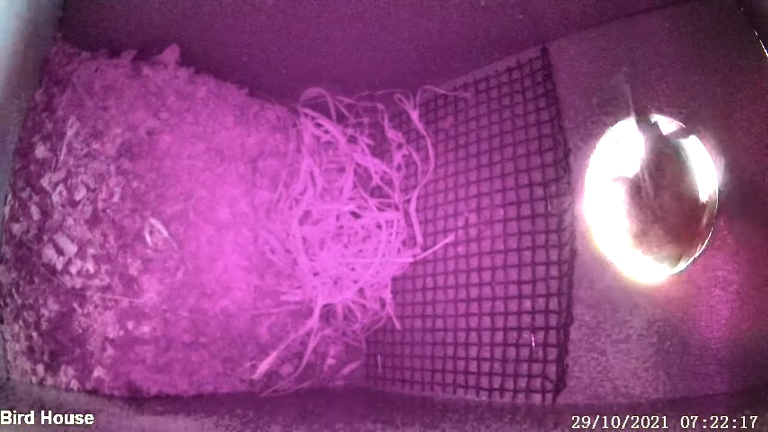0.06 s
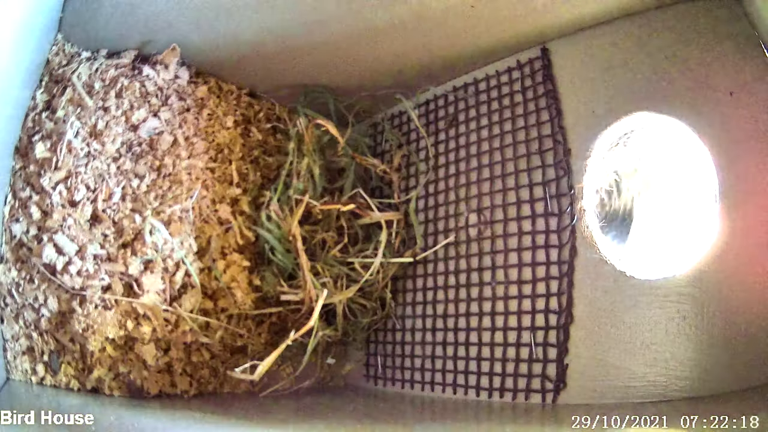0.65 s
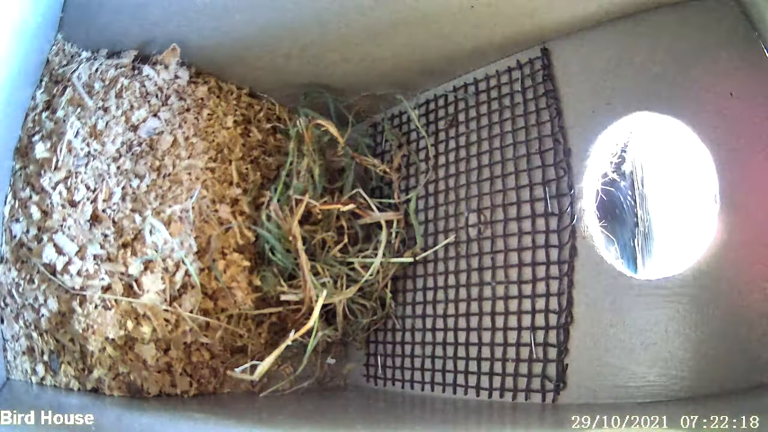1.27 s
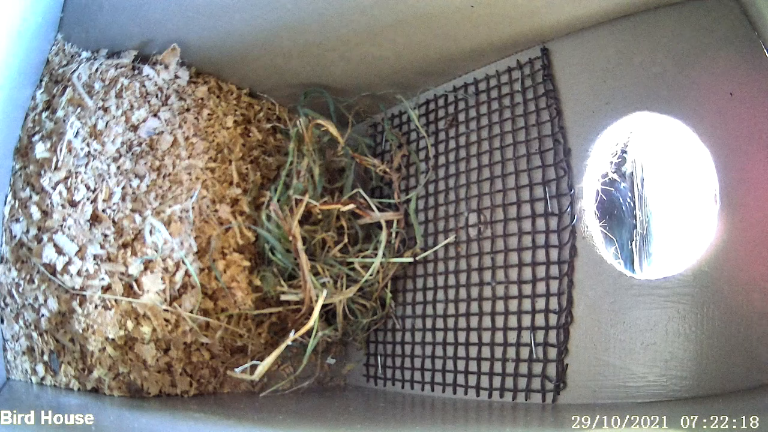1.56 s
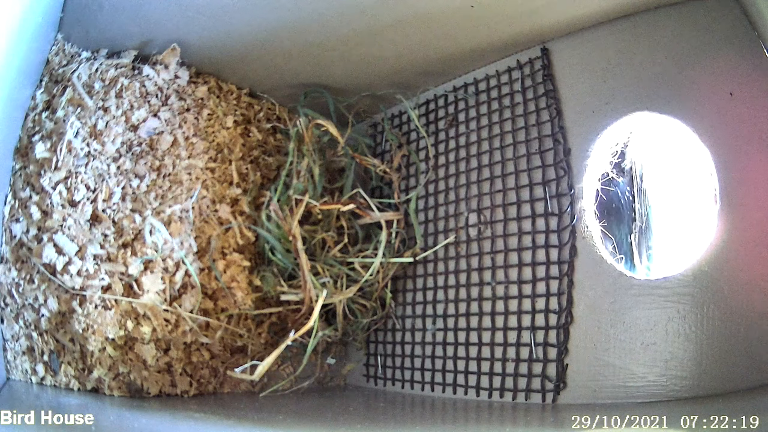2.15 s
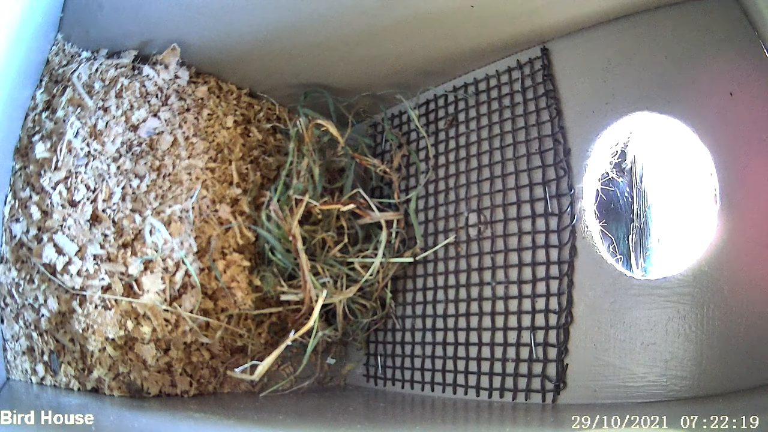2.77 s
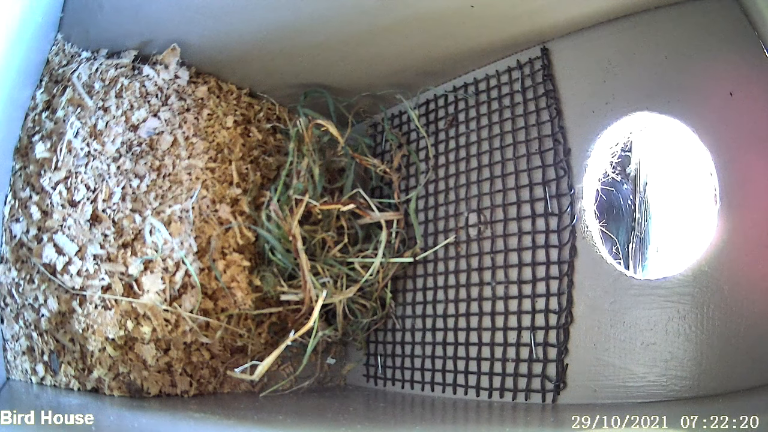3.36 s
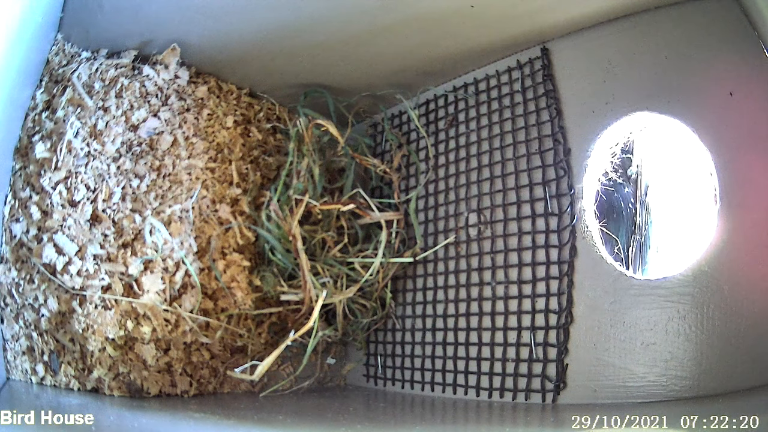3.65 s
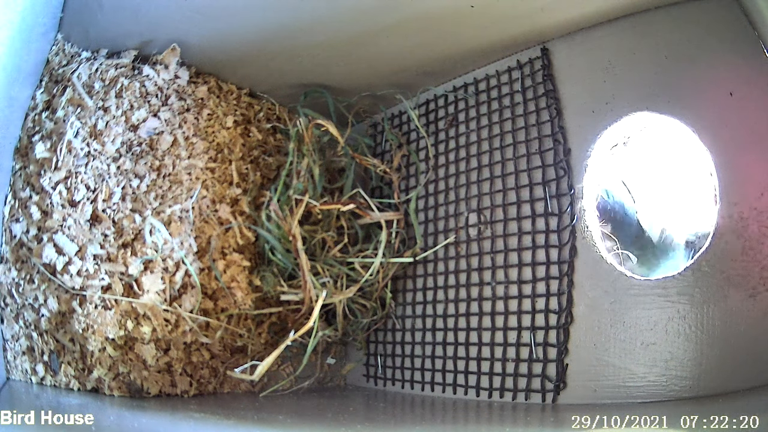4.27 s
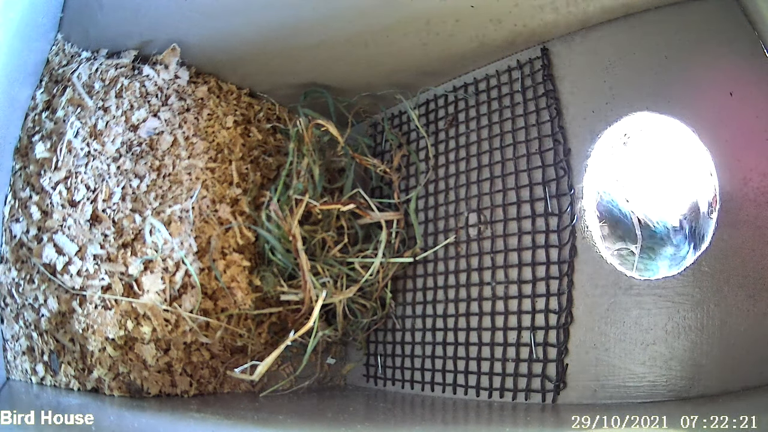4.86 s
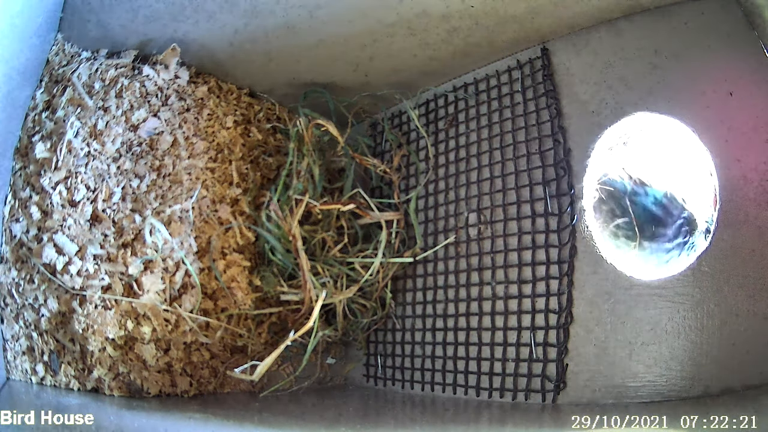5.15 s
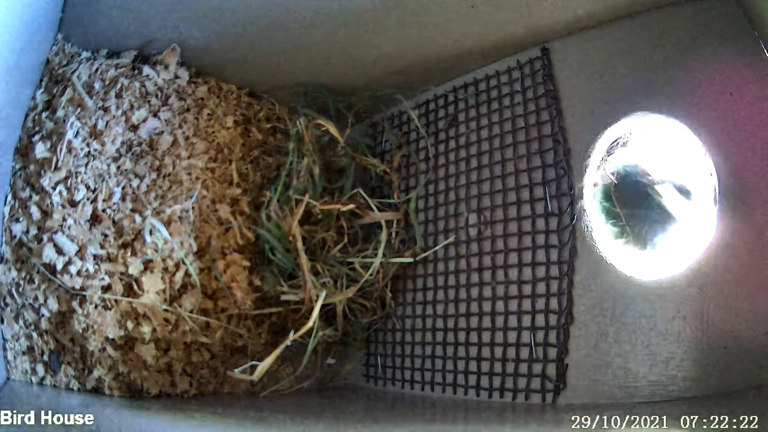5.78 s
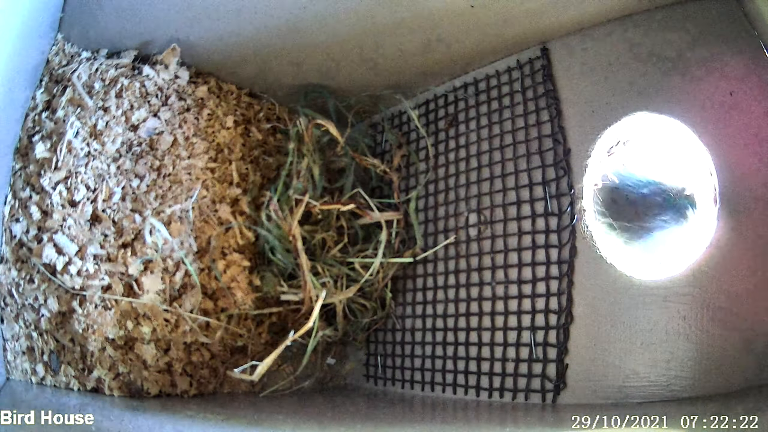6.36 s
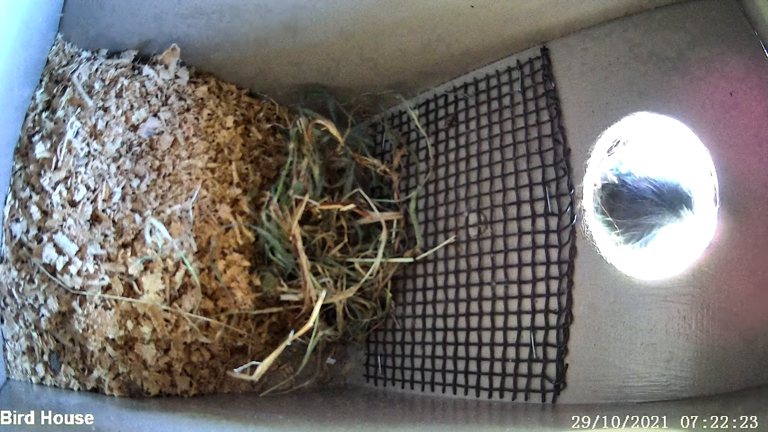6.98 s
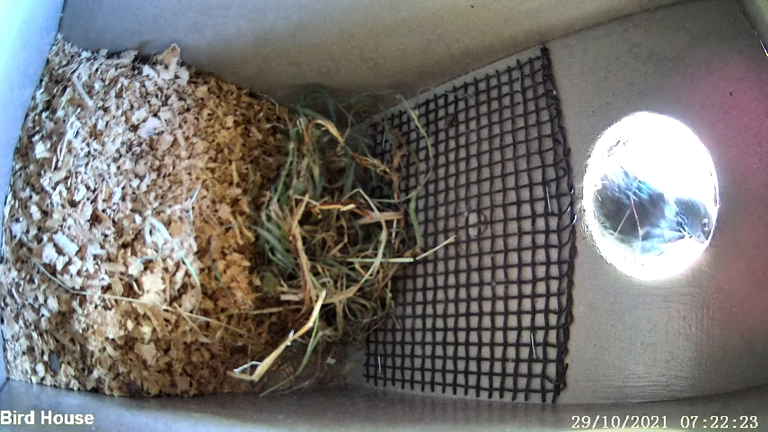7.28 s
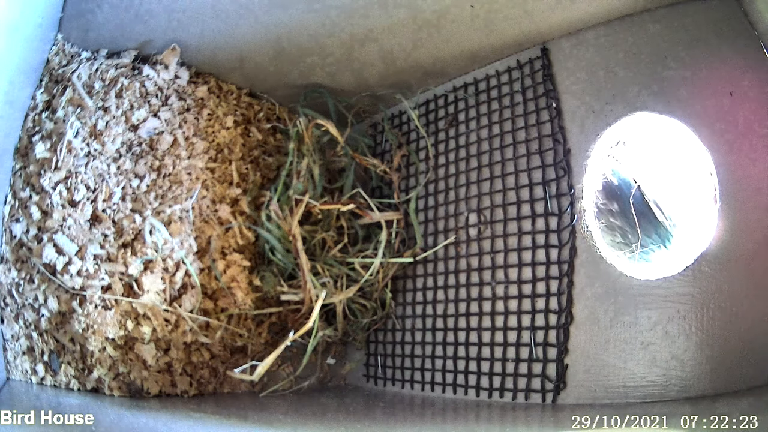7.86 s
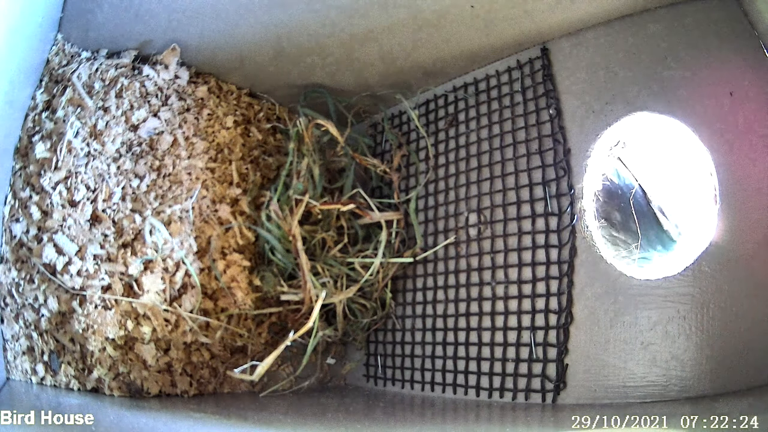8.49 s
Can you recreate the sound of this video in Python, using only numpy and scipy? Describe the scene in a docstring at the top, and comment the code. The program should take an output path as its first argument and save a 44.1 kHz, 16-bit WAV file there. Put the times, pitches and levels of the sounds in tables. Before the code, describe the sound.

A bird lands at the entrance of a wooden nest box, heard close from inside. In the first 0.4 seconds claws scrape and squeak, wings thump the air and feet knock the wall, loud enough to overload briefly. Faint scuffs trail off by 1 second. From about 2.8 to 3.4 seconds comes a second burst of scratching, dull flutters and body bumps, with a softer shuffle near 3.8. Between 4.4 and 5.4 seconds the bird shifts with light scuffs, low puffs of air and four small wooden knocks with tiny squeaks. After that only a few faint scratches remain. Throughout, low wind rumble, a wavering hollow hum and soft hiss continue. Thin, very faint chirps come from outside now and then, clearest near 5.5 seconds. The sound is boxy and narrow, with a glassy edge.

```python
"""A bird clings to the entrance of a wooden nest box, heard by a small camera inside.
Claws scrape, squeak and knock on the wood; wings and body pump the air of the box.
Outdoor rumble hums in the hole, with hiss and faint birds behind it.
The camera overloads on the landing; its narrow-band sample-and-hold adds a glassy edge."""
import sys
import numpy as np
from scipy import signal
from scipy.fft import rfft, irfft, next_fast_len
from scipy.io import wavfile
from scipy.ndimage import uniform_filter1d

SR = 44100
rng = np.random.default_rng(int(sys.argv[2]) if len(sys.argv) > 2 else 0)


def dump(signal):
    """Clip the signal to [-1, 1] and save it as 16-bit WAV at the path in sys.argv[1]."""
    limited = np.clip(np.atleast_2d(signal).T, -1, 1)
    pcm = np.round(limited * 32767).astype(np.int16)
    wavfile.write(sys.argv[1], SR, pcm)


N = 380141
TIME_S = np.arange(N) / SR

# claws catch and skid: (time [s], level [dB], fall [s], treble lift [dB])
CATCHES = [(0.031, -18.5, 0.0032, 5), (0.1, -0.5, 0.0057, -3.5), (0.143, -8.5, 0.0069, 0),
           (0.154, -7.5, 0.0038, 3), (0.2541, 1.5, 0.0026, -4.5), (0.2631, -6.5, .0034, -18),
           (0.464, -40.5, 0.012, -17), (0.792, -39.5, 0.0054, 4), (1.304, -34.5, 0.0026, -3),
           (2.774, -35, 0.0055, 11), (2.916, -34, 0.011, -2), (2.936, -24.5, 0.016, -5),
           (3.067, -15, 0.011, -6.5), (3.133, -3, .012, -1.5), (3.191, -18.5, 0.0082, 11),
           (3.25, -19.5, 0.012, 2), (3.395, -26.5, .008, 0), (3.708, -40.5, 0.047, -8),
           (3.803, -29.5, .009, -24), (4.425, -35, 0.035, -2), (6.072, -44, .008, 12),
           (6.43, -45, 0.0066, 0), (8.554, -40.5, 0.047, -8.5)]
# toes and feathers drag over the rim: (peak time [s], level [dB], fall [s])
SCUFFS = [(0.123, -17, 0.026), (0.169, -17, 0.017), (0.216, -15, 0.022), (0.313, -31, 0.012),
          (0.504, -42.5, 0.026), (0.554, -34.5, .018), (2.847, -40.5, 0.033), (3.165, -22, .014),
          (3.211, -21, 0.018), (3.267, -21, 0.018), (3.32, -33.5, 0.021), (3.763, -32.5, 0.02),
          (4.477, -33.5, 0.014), (4.523, -31.5, 0.016), (4.581, -25, 0.0042), (4.702, -37, .012),
          (4.745, -37, 0.025), (5.383, -36, 0.0083), (5.529, -40, 0.021), (5.65, -39, 0.021)]
# bouts of light scuffs: (start [s], end [s], level [dB])
FIDGETS = [(0, .08, -28), (0.448, .62, -48.5), (0.809, .97, -46), (2.662, 2.83, -47.5), (3.828, 3.94, -46),
           (4.411, 4.6, -40.5), (4.69, 4.8, -42), (4.976, 5.12, -40), (5.28, 5.37, -42.5),
           (5.63, 5.71, -48.5)]
# claw squeaks: (peak time [s], level [dB], pitch [Hz], fall [s])
SQUEAKS = [(0.038, -19, 1308, 0.0093), (0.074, -24.5, 1080, 0.033), (0.104, -7.5, 1103, 0.0088),
           (0.147, -2.5, 1105, 0.0057), (0.38, -36, 1360, 0.0048), (3.144, -13, 1124, .008)]
# feet strike the wall: (time [s], peak [dB])
KNOCKS = [(0.2545, 2), (0.2623, 7.5), (0.268, -5)]
# steps round the rim: (time [s], knock [dB], squeak [dB])
STEPS = [(4.582, -23, -35), (4.768, -18.5, -40), (4.951, -20, -41), (5.163, -14, -35.5)]
# body shoves the air in the hole: (peak time [s], level [dB], pitch [Hz])
SHOVES = [(0.039, -4.5, 96.4), (0.122, 0, 123), (0.215, 4, 119.2), (0.244, 10, 70.6), (2.886, -20, 108),
          (2.976, -5.5, 119), (3.138, -8, 115), (3.191, -4, 73), (3.226, -5, 106), (3.254, 2.5, 81),
          (3.307, -7.5, 101), (3.407, -16, 103), (3.752, -10, 109), (3.773, -5, 113), (3.883, -15, 115),
          (4.44, -6.5, 97), (4.477, -13.5, 113), (4.524, -9, 78), (4.561, -2.5, 125), (4.709, -15, 118),
          (5.351, -14.5, 110.4)]
# breast bumps the wall: (time [s], peak [dB])
BUMPS = [(0.207, -14), (0.262, 1.5), (0.325, -17), (2.968, -19), (3.249, -20), (4.558, -25), (5.351, -22.5)]
# wing beats: (time [s], peak [dB])
WING_BEATS = [(0.168, -2.5), (0.202, -5.5), (0.258, 3), (0.294, -3), (2.905, -25), (3.029, -13),
              (3.109, -12), (3.277, -14), (4.428, -18.5), (4.516, -15), (4.552, -19.5), (5.35, -17)]
# hollow box: (frequency [Hz], width [Hz], gain [dB])
BOX_MODES = [(280, 59, -6), (696.2, 14.8, 9), (735, 11, 4.5), (856, 46, -5.5), (882, 42, -1),
             (1058, 45, 0.5), (1105, 32.6, 7), (1125, 11, -12), (1277, 26, -4), (1400, 34, 2),
             (1500, 13, -35), (1593, 23, -8.5), (1800, 13, -16.5), (2035, 97, -18), (2318, 33, -4),
             (2250, 32, -3), (2451, 100, -8.5), (2790, 22, -10), (2852, 25, -5.5), (2840, 14, -9),
             (3358, 110, -11), (3512, 38, -8)]
# front wall: (frequency [Hz], width [Hz], gain [dB])
WALL_MODES = [(185, 45, -5), (305, 59, 5), (458, 36, 22), (533, 58, 3), (717, 39, 13.5), (850, 48, -9),
              (2840, 350, 2.5)]
# air note of the hole: (time [s], pitch [Hz])
HOLE_HZ = [(0, 114), (1.2, 129), (2.1, 130), (3.3, 114), (4.35, 116), (5.05, 137), (5.5, 142), (6.15, 129),
           (6.6, 138), (8.1, 138), (8.6, 133)]
# air note of the hole: (time [s], level [dB])
HOLE_DB = [(0, -26.5), (1, -34), (2.9, -32), (3.85, -32), (4.35, -39.5), (4.8, -30), (5.4, -29.5),
           (5.65, -35.5), (6.65, -31), (7.1, -36.5), (7.7, -32.5), (8.05, -26.5), (8.6, -34.5)]
# outdoor rumble and hiss: (frequency [Hz], relative density [dB])
OUTDOOR_SPECTRUM = [(12, 0.5), (30, 0.5), (45, -1.5), (100, -4.5), (170, -13), (220, -21.5), (320, -28.5),
                    (600, -34.5), (1000, -38.5), (2000, -41), (3600, -45)]
# wind rumble: (time [s], gain [dB])
RUMBLE_DB = [(0, 11), (.45, 11.5), (.7, -4), (2.2, -1.5), (3.6, -1), (5.2, 5), (5.6, -2), (8.6, -7)]
# box resonances stirred from outdoors: (frequency [Hz], width [Hz], gain [dB])
DRONE_MODES = [(742.3, 18, 10), (848, 70, 4.5), (1078, 42, 4), (1380, 36, -11.5), (2370, 146, -11.5),
               (2780, 25, -6), (3476, 66, -8.5)]
# box drone: (time [s], level [dB])
DRONE_DB = [(0, -54.5), (2, -54), (4.2, -55), (6, -53), (7.2, -53.5), (8.1, -50.5), (8.6, -54.5)]
# birds outside: (peak time [s], level [dB], pitch [Hz])
CHIRPS = [(1.405, -51, 3550), (2.455, -52.5, 2860), (5.455, -42.5, 3550), (6.0, -54, 3550),
          (6.645, -57, 2380), (7.63, -55, 3570), (7.71, -51, 3570), (7.99, -60, 3520), (8.245, -57.5, 3550)]


def claws(box, fidgets_per_s=30, fidget_spread_db=2.5):
    """Catches, scuffs, squeaks, knocks and fidgeting at the entrance."""
    out = np.zeros(N)
    for at_s, db, fall_s, lift_db in CATCHES:
        add(out, *scrape(box, at_s, db, rise_s=0.0019, fall_s=fall_s, lift_db=lift_db))
    for row in SCUFFS:
        add(out, *scuff(box, *row))
    for row in SQUEAKS:
        add(out, *squeak(*row))
    for row in KNOCKS:
        add(out, *knock(*row))
    for start_s, end_s, db in FIDGETS:
        for slot_s in np.arange(start_s, end_s, 1 / fidgets_per_s):
            at_s = slot_s + rng.random() / fidgets_per_s / 2
            add(out, *scuff(box, at_s, db + fidget_spread_db * rng.standard_normal(), fall_s=0.012))
    return out


def scrape(box, at_s, db, rise_s, fall_s, lift_db, slips_per_s=1300, rub=0.2, treble_hz=2000):
    """Claws stick and slip on wood; each slip rings the box."""
    t, lead_in = swell(max(rise_s, 0.012), fall_s)  # a faint swell leads into each stroke
    _, bite = swell(rise_s, fall_s)
    force = np.maximum(bite, 0.12 * lead_in)
    count = len(t)
    slip_db = np.minimum(rng.exponential(1, count), 3)
    slips = gain_of(slip_db) * rng.choice([-1, 1], count)
    slips *= rng.random(count) < slips_per_s / SR
    friction = unit_rms(slips) + rub * rng.standard_normal(count)
    friction = coloured(friction, lambda hz: lift_db / (1 + (treble_hz / (hz + 1)) ** 4))
    stroke = signal.fftconvolve(force * friction, contact_response(box, spread_db=3))[:count]
    return at_s + t[0], gain_of(db) * np.sqrt(np.mean(force ** 2)) * unit_rms(stroke)


def scuff(box, at_s, db, fall_s):
    """Soft scrape; swells and fades."""
    return scrape(box, at_s, db, rise_s=0.6 * fall_s, fall_s=fall_s, lift_db=-2)


def squeak(at_s, db, hz, fall_s):
    """A claw slips evenly enough to sing."""
    return whistle(at_s, db, hz, rise_s=0.55 * fall_s, fall_s=fall_s, jitter=0.013, shimmer=0.24)


def knock(at_s, db, contact_hz=2500):
    """A foot lands; the wall rings briefly."""
    modes = signal.lfilter(*signal.butter(1, contact_hz, fs=SR), ring(WALL_MODES))
    wall = contact_response(modes, spread_db=2)
    return at_s, gain_of(db) * wall / abs(wall).max()


def steps(box, lead_s=0.005, fall_s=0.017):
    """Claws slide and squeak, the foot lands, the body follows."""
    out = np.zeros(N)
    for at_s, knock_db, squeak_db in STEPS:
        add(out, *scuff(box, at_s - lead_s, db=-33.5, fall_s=fall_s))
        add(out, *squeak(at_s - lead_s, squeak_db, hz=2873, fall_s=fall_s))
        add(out, *knock(at_s, knock_db))
        add(out, *shove(at_s, db=-14, hz=132.8))
    return out


def pumped_air():
    """Body and wings push the air of the box."""
    out = np.zeros(N)
    for source, table in (shove, SHOVES), (bump, BUMPS), (wing_beat, WING_BEATS):
        for row in table:
            add(out, *source(*row))
    return out


def shove(at_s, db, hz, rise_s=0.006, open_fall_s=0.021, open_hz=123, buffet=0.11, buffet_hz=110):
    """The body swings and buffets the air; blocking the hole lowers and damps the note."""
    t, envelope = swell(rise_s, open_fall_s * (hz / open_hz) ** 1.83)
    onset = np.clip(t / rise_s + 4, 0, 1)
    noise = rng.standard_normal(len(t))
    eddies = signal.sosfilt(signal.butter(2, buffet_hz, fs=SR, output="sos"), noise)
    air = np.cos(2 * np.pi * hz * t) + buffet * unit_rms(eddies)
    return at_s + t[0], gain_of(db) * onset * uniform_filter1d(envelope, size=130) * air


def bump(at_s, db, hz=178.3, rise_s=0.0019, fall_s=0.0068):
    """Padded blow of the breast on the wall: a few low, dull swings."""
    t = np.arange(SR // 10) / SR
    thud = (1 - np.exp(-t / rise_s)) * np.exp(-t / fall_s) * np.sin(2 * np.pi * hz * t)
    return at_s, gain_of(db) * thud / abs(thud).max()


def wing_beat(at_s, db, doubling_db=24):
    """A wing sucks and presses once; stronger beats last longer."""
    half_s = 0.0079 * 2 ** (db / doubling_db)
    u = np.arange(-5, 5, 1 / (half_s * SR))
    return at_s + u[0] * half_s, gain_of(db) * u * np.exp((1 - u ** 2) / 2)


def hole_hum(width_hz=9, steadiness=0.32):
    """Outdoor rumble resonates in the hole; the note drifts as the bird shifts in front of it."""
    noise = rng.standard_normal(N + SR) + 1j * rng.standard_normal(N + SR)
    flutter = signal.sosfilt(signal.butter(2, width_hz, fs=SR, output="sos"), noise)[SR:]
    power = uniform_filter1d(abs(flutter) ** 2, size=6000)
    flutter /= (power + 1e-12) ** (steadiness / 2)
    phase_rad = 2 * np.pi * np.cumsum(curve(HOLE_HZ)) / SR
    hum = (flutter * np.exp(1j * phase_rad)).real
    return gain_of(curve(HOLE_DB)) * unit_rms(hum)


def outdoors(rumble_hz=70, base_db=-34):
    """Wind rumble and distant hiss, with a hollow drone from the box."""
    points_hz, points_db = np.transpose(OUTDOOR_SPECTRUM)
    noise = rng.standard_normal(N)
    wash = unit_rms(coloured(noise, lambda hz: np.interp(np.log(hz + 1), np.log(points_hz), points_db)))
    rumble = coloured(wash, lambda hz: -20 * np.log10(1 + (hz / rumble_hz) ** 4))
    wash += rumble * (gain_of(curve(RUMBLE_DB)) - 1)
    drone = signal.oaconvolve(rng.standard_normal(N), ring(DRONE_MODES).sum(axis=0))[:N]
    return gain_of(base_db) * wash + gain_of(curve(DRONE_DB)) * unit_rms(drone)


def far_birds():
    """Thin, rough calls from outside."""
    out = np.zeros(N)
    for row in CHIRPS:
        add(out, *whistle(*row, rise_s=0.018, fall_s=0.035, jitter=0.0071, shimmer=1.0))
    return out


def whistle(at_s, db, hz, rise_s, fall_s, jitter, shimmer):
    """Short tone, unsteady in pitch and strength."""
    t, envelope = swell(rise_s, fall_s)
    wander, flicker = unit_rms(uniform_filter1d(rng.standard_normal((2, len(t))), size=90))
    phase_rad = 2 * np.pi * np.cumsum(hz * (1 + jitter * wander)) / SR
    tone = (1 + shimmer * flicker) * np.sin(phase_rad)
    return at_s + t[0], gain_of(db) * envelope * unit_rms(tone)


def ring(modes):
    """Impulse responses of damped modes, one per row."""
    t = np.arange(SR // 5) / SR
    return np.array([gain_of(db) * width_hz * np.exp(-np.pi * width_hz * t) * np.cos(2 * np.pi * hz * t)
                     for hz, width_hz, db in modes])


def contact_response(rings, spread_db):
    """Each contact point stirs the modes in its own proportions."""
    return gain_of(spread_db * rng.standard_normal(len(rings))) @ rings


def swell(rise_s, fall_s):
    """Time around a peak [s]; exponential rise and fall."""
    t = np.arange(-.1, .26, 1 / SR)
    return t, np.exp(np.where(t < 0, t / rise_s, -t / fall_s))


def curve(points):
    """Breakpoints to one value per sample."""
    return np.interp(TIME_S, *np.transpose(points))


def gain_of(db):
    """Decibels to amplitude."""
    return 10 ** (np.asarray(db) / 20)


def unit_rms(x):
    """Scales to rms 1."""
    return x / np.sqrt(np.mean(x ** 2) + 1e-20)


def add(mix, start_s, sound):
    """Mixes a sound in from start_s."""
    start = round(start_s * SR)
    sound = sound[max(-start, 0):]
    part = mix[max(start, 0):][:len(sound)]
    part += sound[:len(part)]


def coloured(x, db_at):
    """Filters by a gain rule, Hz to dB."""
    size = next_fast_len(len(x))
    return irfft(rfft(x, size) * gain_of(db_at(np.fft.rfftfreq(size, 1 / SR))), size)[:len(x)]


def low_pass(x, hz):
    """Steep band limit."""
    return signal.oaconvolve(x, signal.firwin(1023, hz, window=("kaiser", 8), fs=SR), "same")


def suppressor(x, memory_s=0.033, margin_db=5, slope=0.78, max_cut_db=9, full_above_hz=600):
    """Noise reduction cuts bands that fall below their recent level; strokes end drier."""
    hz, _, spectra = signal.stft(x, SR, nperseg=512, noverlap=384)
    power = uniform_filter1d(abs(spectra) ** 2, size=7, axis=0)
    power = uniform_filter1d(power, size=5, axis=1)
    now_db = 10 * np.log10(abs(power) + 1e-14)
    pole = np.exp(-128 / SR / memory_s)
    recent_db = signal.lfilter([1 - pole], [1, -pole], now_db, zi=pole * now_db[:, :1])[0]
    cut_db = np.clip(slope * (recent_db - now_db - margin_db), 0, max_cut_db)
    cut_db *= np.clip(hz / full_above_hz, 0, 1)[:, None] ** 2
    return signal.istft(spectra * gain_of(-cut_db), SR, nperseg=512, noverlap=384)[1][:N]


def scene(low_cut_hz=540):
    """All sources at one microphone inside the box."""
    low_cut = signal.butter(2, low_cut_hz, "high", fs=SR, output="sos")  # small claws move little air
    box = signal.sosfilt(low_cut, ring(BOX_MODES))
    outside = hole_hum() + outdoors() + far_birds()
    return (outside + pumped_air() + steps(box) + claws(box))[None]


def record(dry, band_hz=3660, ceiling=0.73, hold_hz=8000, top_hz=15850):
    """The narrow-band input saturates; sample-and-hold mirrors it into the treble."""
    narrow = low_pass(suppressor(dry[0]), band_hz)
    saturated = narrow / (1 + (narrow / ceiling) ** 4) ** (1 / 4)
    samples = np.interp(np.arange(0, N / SR, 1 / hold_hz), TIME_S, saturated)
    held = signal.resample_poly(np.repeat(samples, 12), SR, 12 * hold_hz)[:N]
    return low_pass(held, top_hz)[None]


dry = scene()
out = record(dry)
dump(out)
```